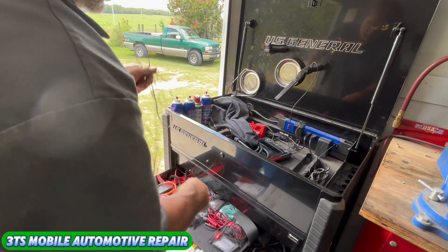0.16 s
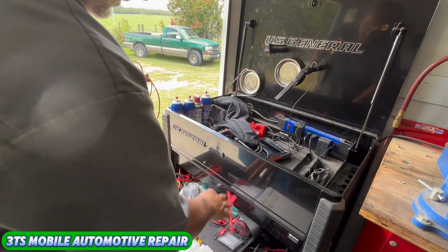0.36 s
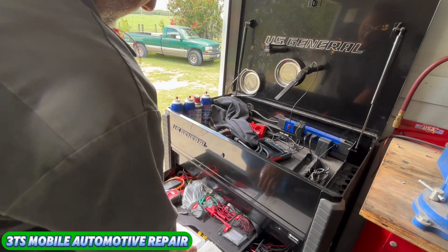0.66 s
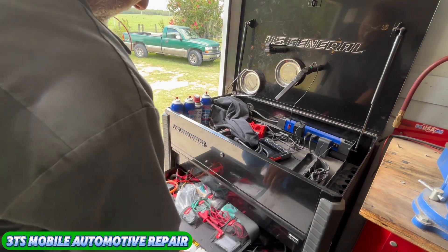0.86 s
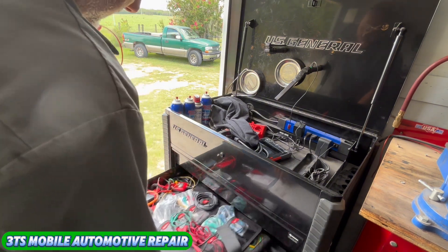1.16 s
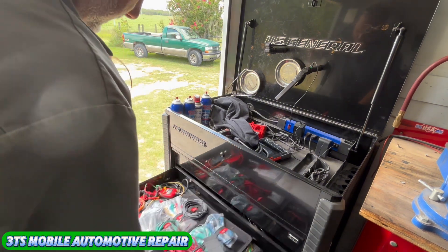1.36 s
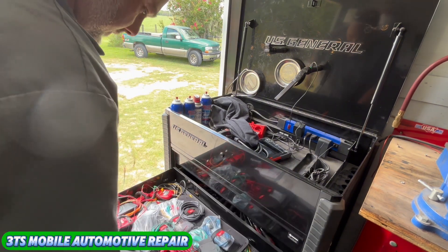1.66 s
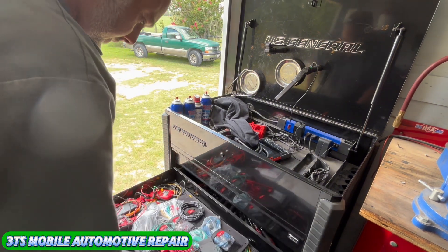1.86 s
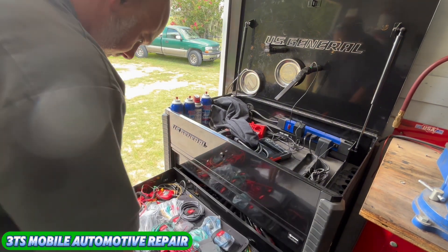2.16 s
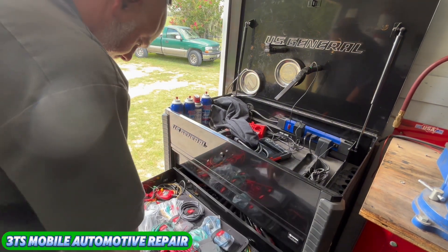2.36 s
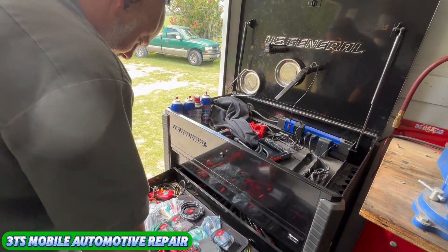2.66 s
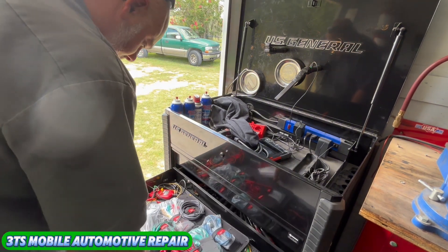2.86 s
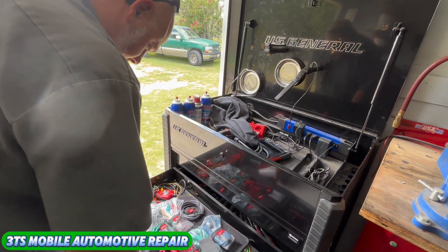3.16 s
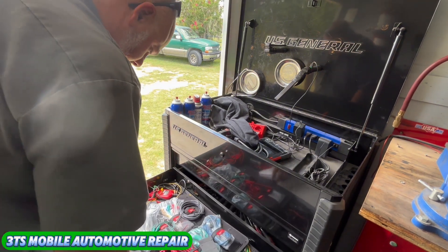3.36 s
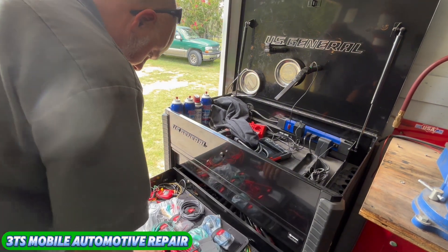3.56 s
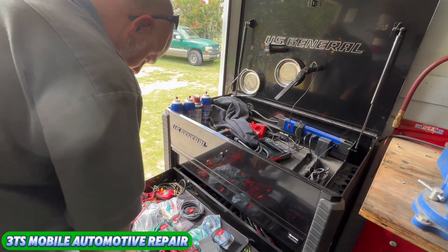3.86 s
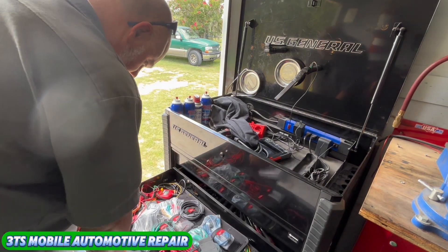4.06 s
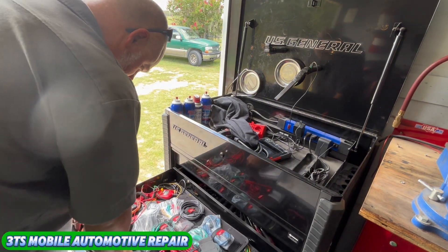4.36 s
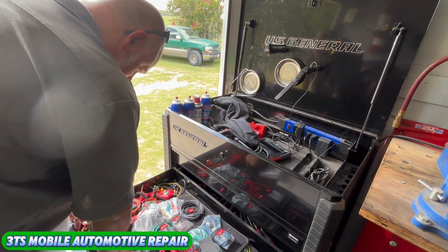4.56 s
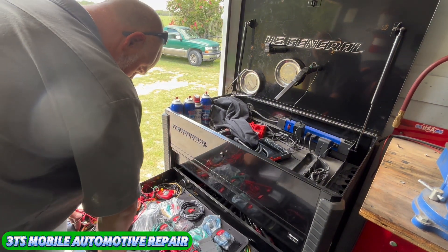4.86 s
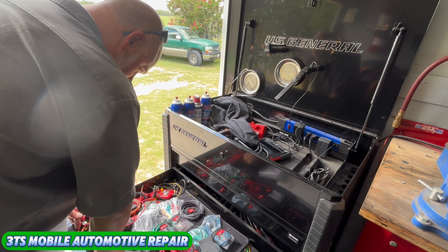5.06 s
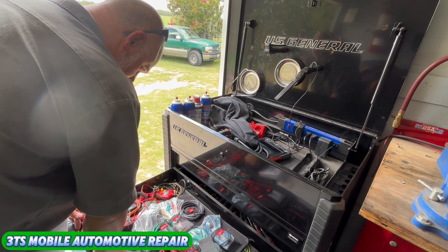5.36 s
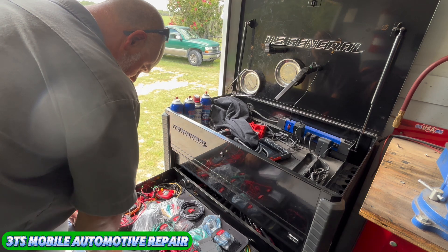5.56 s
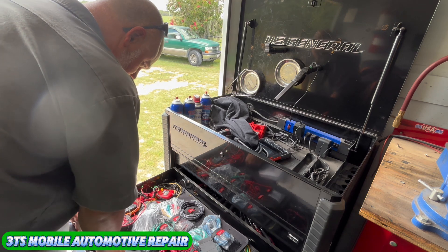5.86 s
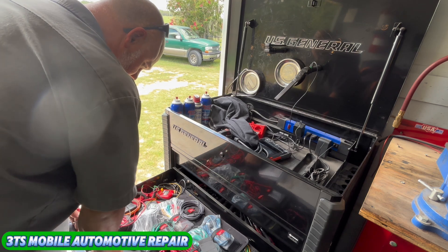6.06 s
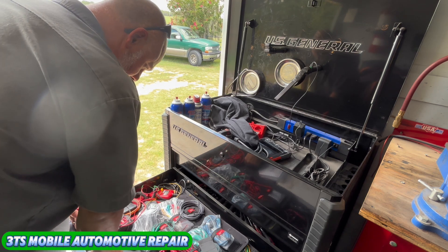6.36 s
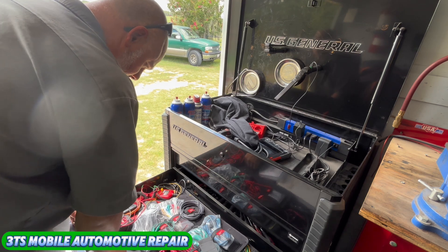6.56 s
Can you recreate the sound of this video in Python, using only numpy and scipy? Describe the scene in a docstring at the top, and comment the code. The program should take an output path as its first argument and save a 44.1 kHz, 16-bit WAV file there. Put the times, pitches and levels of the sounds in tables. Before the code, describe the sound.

One loud metallic clatter in a steel tool drawer, then lighter clinks and dull bumps of rummaging, with wind buffeting the microphone early on.

```python
"""Rummaging in a steel tool drawer

Someone digs through wires and small parts in a sheet-steel drawer, a metre from a phone by an open garage door.
Blows and clinks ring decaying steel modes and shaped noise; dragged wires catch and slip in bursts of it.
Gusts buffet the two microphone ports with low pulses and wavering noise bands, partly in opposition.
Filtered noise makes the low rumble, the distant swish and the outdoor hiss underneath."""
import sys
import numpy as np
from scipy import signal
from scipy.fft import rfft, irfft
from scipy.io import wavfile
from scipy.ndimage import uniform_filter1d

SR = 44100
rng = np.random.default_rng(int(sys.argv[2]) if len(sys.argv) > 2 else 0)


def voltage_ratio(level):
    """Linear amplitude factor for a level in decibels (scalar or array-like)."""
    return 10 ** (np.asarray(level, float) / 20)


def transcribe(u):
    """Save the signal u as a 16-bit wav file named by the first command-line argument.

    u: samples, shape (n,) or (channels, n), limited to [-1, 1]; the rate is SR.
    q: integer samples, one column per channel.
    """
    v = np.clip(np.atleast_2d(u).T, -1, 1)
    q = np.round(v * 32767).astype(np.int16)
    wavfile.write(sys.argv[1], SR, q)


N = 295911

# Ringing modes of the drawer pan and loose parts. Each row: frequency in Hz, level in dB,
# t60 in seconds for a blow whose own t60 is 0.17 s.
STEEL_MODES = [(194.6, 4.5, 0.3), (372.4, 9.5, 0.064), (442, 1.5, 0.13), (560, 3, 0.026),
               (673.6, -0.5, 0.11), (707, 6, 0.057), (870, 3, 0.023), (952, 14, 0.028), (1122, 9.5, 0.028),
               (1342, 4.5, 0.09), (1768, 8, 0.1), (2290, 1, 0.052), (3290, 0, 0.048), (3600, -20, 0.14),
               (4100, 2, 0.056), (4480, 3, 0.068)]
# Far-off sounds. Each row: time in seconds, low drone in dB, mid swish in dB, hiss in dB.
FAR_LEVELS = [(0, -68, -66, -52.5), (.7, -69, -64, -52), (1.0, -55, -47, -52.5), (1.35, -58, -49, -50.5),
              (1.8, -66, -64, -53), (2.6, -61, -68, -52.5), (4.0, -61, -74, -52.5), (5.2, -63, -62, -56.5),
              (5.6, -46.5, -63.5, -56), (6.2, -49, -71, -57), (6.71, -47, -69, -55)]
# Single eddies slapping the ports. Each row: start in seconds, slap level in dB, centre in Hz,
# level in dB of the buffeting that swells with it, time scale of that swell in seconds.
EDDIES = [(0.0, -44, 89, -34.5, 0.027), (0.17, -32, 190, -31, 0.26), (0.24, -20.5, 120, -21.5, 0.029),
          (0.277, -20, 300, -52, 0.081), (0.334, -35, 120, -26, 0.035), (0.673, -40, 144, -49, 0.044),
          (0.7, -33.5, 196, -59, 0.043), (0.822, -37.5, 222, -41, 0.022), (0.968, -30, 280, -28.5, 0.048),
          (1.171, -33, 280, -36.5, 0.012), (1.244, -35.5, 143, -38, 0.022), (1.342, -42, 90, -36.5, 0.14),
          (1.472, -54, 87, -28, 0.015), (1.555, -42, 110, -34.5, 0.028), (1.762, -22.5, 193, -27, 0.069),
          (1.799, -32, 122, -47, 0.047), (1.863, -24.5, 216, -32, 0.082), (1.913, -31.5, 152, -29.5, 0.036),
          (1.958, -31.5, 89.5, -47, .04), (2.044, -33, 190, -29, 0.035), (2.083, -27, 136, -35.5, 0.036),
          (2.208, -35.5, 169, -38.5, 0.039), (2.287, -33, 290, -60, 0.05), (2.414, -39.5, 353, -33, 0.013),
          (3.9, -38.5, 113, -40, 0.024), (4.61, -34.5, 150, -38.5, 0.036),
          (4.681, -39.5, 120, -40.5, 0.047), (5.929, -33.5, 217, -52, 0.051),
          (6.206, -53, 89, -44.5, 0.052)]
OPPOSED = np.array([[1], [-1]])  # left and right in opposite sign


def unit(x):
    """Scale to rms 1."""
    return x / np.sqrt(np.mean(x ** 2, axis=-1, keepdims=True) + 1e-30)


def curve(rows):
    """Columns of a time table, one value a sample."""
    s, *columns = np.transpose(rows)
    return [np.interp(np.arange(N) / SR, s, c) for c in columns]


def colour(x, points, lag_s=0.):
    """Filter through (Hz, dB) points, with a delay."""
    hz, db = np.transpose(points)
    f = np.arange(N // 2 + 1) * SR / N
    gain = voltage_ratio(np.interp(np.log(f + 1), np.log(hz), db))
    return irfft(rfft(x) * gain * np.exp(-2j * np.pi * f * lag_s), N)


def band(x, lo_hz, hi_hz, order=2):
    """Causal band-pass."""
    return signal.sosfilt(signal.butter(order, [lo_hz, hi_hz], "band", fs=SR, output="sos"), x)


def high_pass(x, hz, order):
    """Causal bass cut."""
    return signal.sosfilt(signal.butter(order, hz, "high", fs=SR, output="sos"), x)


def decay(t, t60):
    """Exponential fade that falls 60 dB in t60 seconds."""
    return np.exp(-np.log(1000) * t / t60)


def walk(rate):
    """Random levels held 1 / rate seconds and smoothed twice."""
    k = int(SR / rate)
    held = np.repeat(rng.standard_normal(N // k + 1), k)
    return 0.8 * uniform_filter1d(uniform_filter1d(held, k), k)[:N]


def steel_noise():
    """Dense ringing of sheet steel in three registers, one common and one private take for each port."""
    # Spectrum of the clatter. Each row: frequency in Hz, level in dB per Hz.
    clatter_spectrum = [(820, -45), (1400, 4), (2290, 12), (3010, 7.5), (3390, 7), (7070, -10), (9960, -13),
                        (11300, -29), (14200, -23.5), (15500, -54)]
    # Lift of the very top. Each row: frequency in Hz, gain in dB.
    top_lift = [(10800, 4), (11800, 9.5)]
    fizz_from_hz, pan_db = 6000, -8
    raw = rng.standard_normal((3, N))
    bright = colour(colour(raw, clatter_spectrum), top_lift)
    pan_hz = STEEL_MODES[0][0]
    pan = unit(band(raw, 0.956 * pan_hz, 1.076 * pan_hz))
    boom = unit(band(raw, 428, 740, order=1)) + voltage_ratio(pan_db) * pan
    clatter = band(bright, 550, fizz_from_hz)
    fizz = band(bright, fizz_from_hz, 13700, order=3)
    return [unit(p) for p in (boom, clatter, fizz)]


def blows(noise):
    """Each blow chatters briefly and rings the modes near where it lands, over a crack and a dying wash."""
    # Blows on the drawer. Each row: start in seconds, clatter level in dB, boom relative to the clatter in dB,
    # fizz relative to the clatter in dB (both before fixed trims), t60 of the wash in seconds.
    blow_rows = [(0.343, -30, -12.5, -31, 0.13), (0.4042, -5, -10.5, -15, 0.18),
                 (0.435, -21, -20, -6.5, 0.079), (0.4983, -24, -22, -14.5, 0.029),
                 (0.536, -39.5, 18.5, -2, 0.075), (0.545, -41, 18.5, -17, 0.12),
                 (0.5645, -44.5, 13, 3, 0.31), (1.4264, -24.5, -2, -1, 0.15),
                 (1.4444, -30.5, 4, -5.5, 0.39), (1.5189, -39, -6, -5, 0.07), (1.604, -18, -2, -5, 0.15),
                 (1.681, -57.5, 8, 3.5, 1), (1.8886, -44, -8, -1.5, 0.13), (2.529, -40.5, 1.5, -8, 0.18),
                 (2.7702, -44.5, 6, -7, 0.13), (2.8096, -47.5, -8, -6, 1), (2.9626, -44, 10, -3.5, 0.19),
                 (3.3049, -32, 3.5, -9.5, 0.13), (3.3997, -59, 11.5, 6.5, 0.61), (3.5014, -48, 6, 0, 0.47),
                 (3.5322, -29, 13, -1, 0.057), (3.538, -27, -4, -9, 0.066), (3.55, -35, -6, -6.5, 0.4),
                 (3.6092, -37, 8.5, -6, 0.12), (3.6316, -44.5, 13, 3, 0.26), (3.6866, -33, 9, -7, 0.12),
                 (3.7, -41, 10.5, 1, 0.18), (3.7389, -45.5, 9.5, -1, 0.13),
                 (3.7884, -48.5, 16.5, -14, 0.16), (4.0731, -22.5, 3, -35, 0.19),
                 (4.196, -37, -34, -11, 0.11), (4.2762, -43.5, -20, -9.5, 0.27),
                 (4.4427, -48, 15, -23, 0.29), (4.4868, -50, 23.5, -28, 0.047),
                 (4.8214, -38, -8, -14, 0.091), (4.8365, -38.5, 12, -26, 0.086),
                 (4.854, -50, 27, -20, 0.05), (4.8635, -41, -8, 1, 0.086), (4.872, -50.5, 30, -10, 0.033),
                 (4.8882, -47.5, -12, 5.5, 0.23), (4.9213, -41.5, 12.5, -18, 0.077),
                 (5.0399, -26.5, -24.5, -10.5, 0.15), (5.1694, -58.5, 14, -21, 0.12),
                 (5.4055, -33, -14, -16, 0.16), (5.5494, -62, 16, -21, 0.19),
                 (5.6241, -45.5, -14, -8.5, 0.14), (5.8694, -63.5, 17, -26, 0.3),
                 (5.9369, -36, -2.5, -10, 0.12), (6.0852, -32.5, -6, -16, 0.15),
                 (6.1409, -43.5, 1.5, -33, 0.24), (6.4717, -43, 7.5, -20, 0.16),
                 (6.6627, -40.5, -14, -12.5, 0.28)]
    # Where the blows land. Each row: time in seconds, centre of the boom in Hz before a random stray.
    landing_rows = [(0.4, 670), (1.44, 473), (1.6, 550), (2.77, 920), (2.96, 560), (3.3, 415), (3.5, 890),
                    (3.53, 890), (3.66, 394), (3.79, 690), (4.07, 463), (4.46, 434), (4.84, 560),
                    (4.875, 332), (4.92, 560), (5.94, 408), (6.14, 630), (6.48, 402)]
    stray_oct, boom_width_oct, boom_top_hz = 0.041, 0.93, 1500
    ring_db, pan_db, bright_db, spread_db = -17, -9, -8, 3.0
    wash_db, crack_db, crack_s = -10, -10, 0.00052
    rattle_db, rattle_s, first_contact = 3.0, 0.01, 10.2
    boom_rise_s, contact_s, softest_s = 0.0017, 0.00038, 0.0017
    tick_db, tick_s = 2.0, 0.0035

    out = np.zeros((3, N + SR))
    t = np.arange(SR // 4) / SR
    count = len(blow_rows)
    hz, mode_db, mode_t60 = np.transpose(STEEL_MODES)
    tick = unit(band(rng.standard_normal(N), 11600, 14000))  # thin top edge of a contact
    rattle = voltage_ratio(rattle_db * walk(130))  # loose parts hop about, so the wash is uneven
    swell = 1 - np.exp(-t * hz[:, None] / (boom_rise_s * hz[0]))  # low panels take longer to get going
    chance = rng.standard_normal((count, 2, len(hz)))
    chatter = rng.standard_normal((count, 3, SR // 20)) * np.exp(-t[:SR // 20] / rattle_s)
    chatter[:, :, 0] += first_contact  # the first contact is the firmest
    chatter /= np.sqrt(np.sum(chatter ** 2, axis=2, keepdims=True))
    landing = np.interp(np.transpose(blow_rows)[0], *np.transpose(landing_rows))
    landing = landing * 2 ** (stray_oct * rng.uniform(-1.5, 1, count))

    for row, boom_hz, (size, tune), push in zip(blow_rows, landing, chance, chatter):
        s, db, boom_db, fizz_db, t60 = row
        i = int(s * SR)
        n = min(len(t), N - i)
        near_db = -6 * (np.log2(hz / boom_hz) / boom_width_oct) ** 2
        near_db[0] = pan_db  # the whole pan flexes wherever it is struck
        share_db = np.where(hz < boom_top_hz, boom_db + near_db + 8.0, bright_db)
        gain = voltage_ratio(ring_db + mode_db + share_db + spread_db * size)
        # a long clatter keeps the modes going longer
        fade = decay(t, mode_t60[:, None] * t60 / 0.17)
        tuned_hz = hz * (1 + 0.0063 * tune)
        ring = gain @ (fade * swell * np.sin(2 * np.pi * tuned_hz[:, None] * t))
        # dull blows come from soft things that push longer
        soft = 1 - np.exp(-t / min(contact_s * voltage_ratio(boom_db), softest_s))
        out[:, i:i + len(t)] += voltage_ratio(db) * soft * signal.fftconvolve(ring[None], push, axes=1)[:, :len(t)]

        tail = voltage_ratio(wash_db) * decay(t, t60) * soft
        crack = voltage_ratio(crack_db) * np.exp(-t / crack_s) * np.sqrt(soft)
        boom, clatter, fizz = (p[:, i:i + n] for p in noise)
        # the wash is strongest near the struck panel's pitch and builds up slowly
        near_boom = voltage_ratio(-6.5) * band(boom, boom_hz / 1.8, boom_hz * 1.08)
        near_clatter = voltage_ratio(-6.0) * band(clatter, boom_hz, boom_hz * 2.45)
        boom = (boom + near_boom + near_clatter) * (1 - np.exp(-t[:n] / 0.0035))
        wash = voltage_ratio(boom_db + 3.5) * boom * tail[:n]
        wash = wash + (clatter + voltage_ratio(fizz_db + 7.0) * fizz) * (tail + crack)[:n]
        out[:, i:i + n] += voltage_ratio(db) * wash * rattle[i:i + n]
        # the tick joins the common take only, so it is alike at both ports
        out[0, i:i + n] += voltage_ratio(db + fizz_db + tick_db) * np.exp(-t[:n] / tick_s) * tick[i:i + n]
    return out[:, :N]


def clinks():
    """A shaken part or panel rings on one unsteady, broken tone; high and quickly damped ones are broad."""
    # Parts whose ring stands out. Each row: start in seconds, frequency in Hz, level in dB,
    # rise in seconds, t60 in seconds.
    clink_rows = [(0.405, 1200, -24, 0.0053, 0.14), (0.407, 1328, -26.5, 0.0055, 0.13),
                  (3.306, 1370, -30, 0.0016, 0.04), (4.074, 1450, -34, 0.003, 0.2),
                  (5.94, 436, -40, 0.005, 0.11), (0.404, 369, -18, 0.02, 0.068),
                  (0.406, 694, -23.5, 0.017, 0.16), (0.405, 952, -19.5, 0.0096, 0.11),
                  (0.404, 1593, -15, 0.006, 0.068), (0.405, 2300, -22.5, 0.005, 0.12),
                  (0.405, 3480, -15, 0.0042, 0.079), (0.498, 2200, -39, 0.003, 0.051),
                  (1.605, 890, -26, 0.0029, 0.081), (1.605, 2440, -29.5, 0.003, 0.1),
                  (1.604, 3420, -25.5, 0.0027, 0.1), (1.604, 4960, -27.5, 0.00089, 0.029),
                  (3.537, 2430, -30, 0.0015, 0.042), (3.538, 3100, -35, 0.002, 0.06),
                  (4.076, 448, -28, 0.0065, 0.14), (4.077, 1036, -30.5, 0.0031, 0.15),
                  (4.904, 6540, -43, 0.001, 0.058), (0.579, 2860, -38.5, 0.017, 0.22),
                  (0.581, 4100, -39.5, 0.017, 0.23), (1.68, 4120, -35, 0.00073, 0.035),
                  (4.084, 4100, -41, 0.017, 0.13), (4.194, 2770, -47, 0.0016, 0.12),
                  (4.195, 4900, -44, 0.0013, 0.022), (4.866, 3320, -41, .001, 0.071),
                  (4.887, 6700, -37.5, .001, 0.06), (5.039, 2064, -36, 0.0029, 0.084),
                  (5.405, 4000, -44.5, 0.001, 0.07), (5.625, 2880, -51, 0.002, 0.05),
                  (5.039, 3860, -28.5, 0.00076, 0.054), (5.04, 8400, -38, 0.0012, 0.13),
                  (5.407, 3460, -43.5, 0.00078, 0.07), (6.085, 3750, -38.5, 0.0029, 0.14),
                  (1.889, 3750, -44, .001, 0.055), (5.94, 2430, -43, 0.0017, 0.056)]
    width, blur, rough_hz = 0.02, 0.31, 2000
    waver, broken_db_per_khz = 0.0044, 0.57
    out = np.zeros((3, N + SR))
    t = np.arange(SR // 3) / SR
    turns = rng.uniform(0, 2 * np.pi, (len(clink_rows), 3, 1))
    noises = rng.standard_normal((len(clink_rows), 3, len(t)))
    jolts = np.pad(broken_db_per_khz * walk(90), (0, SR))
    for (s, hz, db, rise_s, t60), raw, turn in zip(clink_rows, noises, turns):
        i = int(s * SR)
        shape = np.sqrt(np.minimum(t / rise_s, 1)) * decay(np.maximum(t - rise_s, 0), t60)
        drift = np.cumsum(1 + waver * unit(uniform_filter1d(raw, size=400)), axis=1) / SR
        width_hz = width * hz + blur * np.sqrt(hz) / t60 / 10
        tone = np.sqrt(2) * np.sin(2 * np.pi * hz * drift + turn)
        tone = tone + hz / rough_hz * unit(band(raw, hz - width_hz, hz + width_hz, order=1))
        level = voltage_ratio(db + hz / 1000 * jolts[i:i + len(t)])
        out[:, i:i + len(t)] += level * shape * unit(tone)
    return out[:, :N]


def drags(noise):
    """Strands catch and slip unevenly; every slip is a short burst of the steel's noise."""
    # Wire dragging over the steel. Each row: start in seconds, length in seconds, rasp level in dB,
    # boom relative to the rasp in dB, share of the length spent swelling (0-1).
    drag_rows = [(0.55, 0.18, -41, -20, 0.4), (1.418, 0.18, -31.5, 5, 0.09), (1.947, 0.095, -52, -12, 0.76),
                 (2.767, 0.077, -50, 7, 0.5), (2.936, 0.1, -51.5, -1, 0.18), (3.297, 0.64, -56, 8, 0.01),
                 (3.591, 0.19, -46.5, 6.5, 0.41), (4.804, 0.18, -53, 12.5, 0.64)]
    slips_per_s, slip_db, slip_s, fizz_db = 380, 5, 0.0074, -8
    start_db, end_db = -27, -34  # relative to the height of the drag
    slip_sizes = voltage_ratio(slip_db * np.minimum(rng.exponential(size=N), 3))
    hits = (rng.random(N) < slips_per_s / SR) * slip_sizes
    grain = unit(signal.lfilter([1], [1, -np.exp(-1 / (slip_s * SR))], hits))
    rasp, boom = np.zeros(N), np.zeros(N)
    for s, length_s, db, boom_db, swell in drag_rows:
        a, n = int(s * SR), int(length_s * SR)
        shape_db = np.interp(np.arange(n) / n, [0, swell, 1], [start_db, 0, end_db])
        pull = signal.windows.tukey(n, .15) * voltage_ratio(db + shape_db)
        rasp[a:a + n] += pull
        boom[a:a + n] += pull * voltage_ratio(boom_db)
    return grain * (boom * noise[0] + rasp * (noise[1] + voltage_ratio(fizz_db) * noise[2]))


def stirring(noise):
    """The hand keeps stirring the heap: parts nudge the pan in faint bumps at random times."""
    from_s, bumps_per_s, bump_db, spread_db = 3.3, 19, -62, 3
    t60, clatter_db = 0.14, -8
    hits = (rng.random(N) < bumps_per_s / SR) * voltage_ratio(bump_db + spread_db * rng.standard_normal(N))
    hits = hits * (np.arange(N) > from_s * SR)
    bump = signal.lfilter([1], [1, -decay(1 / SR, t60)], hits)
    return uniform_filter1d(bump, size=300) * (noise[0] + voltage_ratio(clatter_db) * noise[1])


def garage(x):
    """A short dull tail from the chest lid and the walls, different at each port."""
    t60, wet_db, first_echo_s = 0.21, -16, .004
    t = np.arange(int(SR * .4)) / SR
    tail = band(rng.standard_normal((2, len(t))), 190, 7500, order=1) * decay(t, t60) * (t > first_echo_s)
    tail /= np.sqrt(np.sum(tail ** 2, axis=1, keepdims=True))
    return voltage_ratio(wet_db) * signal.fftconvolve(x[None], tail, axes=1)[:, :N]


def puffs():
    """Each eddy slaps the ports with a few rough low cycles that swell and die."""
    cycles, side_db, rough = 1.23, 3, 0.19  # the slap peaks after this many cycles
    out = np.zeros((2, N + SR))
    t = np.arange(SR // 8) / SR
    turns = rng.uniform(0, 2 * np.pi, (len(EDDIES), 2, 1))
    noises = rng.standard_normal((len(EDDIES), 2, len(t)))
    for (s, db, hz, *_), raw, turn in zip(EDDIES, noises, turns):
        i = int(s * SR)
        u = t * hz / cycles
        slap = np.sin(2 * np.pi * hz * t + turn) + rough * unit(band(raw, hz / 2, hz * 2))
        mid, side = u * np.exp(1 - u) * slap
        out[:, i:i + len(t)] += voltage_ratio(db) * (mid + voltage_ratio(side_db) * side * OPPOSED)
    return out[:, :N]


def knocks():
    """A push of air between two pulls, a few milliseconds long and a little ragged."""
    # Sharp low knocks at the ports. Each row: time of the middle in seconds, level in dB, centre in Hz.
    knock_rows = [(0.243, -29, 454), (0.283, -20, 590), (1.868, -26, 420), (1.918, -35, 377),
                  (2.293, -29.5, 443), (2.422, -31.5, 407)]
    side_db, rough = -3, 0.13
    out = np.zeros((2, N))
    t = np.arange(-400, 400) / SR
    for s, db, hz in knock_rows:
        u = np.pi * hz * t
        bell = np.exp(-u ** 2 / 2)
        ragged = unit(band(rng.standard_normal((2, len(t))), hz / 2, hz * 2, order=4))
        mid = bell * ((1 - 2 * u ** 2) * bell + rough * ragged[0])
        side = bell * ragged[1]
        i = int(s * SR) - len(t) // 2
        out[:, i:i + len(t)] += voltage_ratio(db) * (mid + voltage_ratio(side_db) * side * OPPOSED)
    return out


def buffeting():
    """Breeze plus a swell for each eddy; the crackle follows the pitch of the eddy that rules."""
    # Steady breeze between the eddies. Each row: time in seconds, buffet level in dB.
    breeze = [(0, -50), (.12, -47.5), (.6, -47), (1.09, -48.5), (1.4, -44), (1.7, -34), (1.95, -44),
              (2.01, -41), (2.17, -46.5), (2.25, -36), (2.34, -42), (2.5, -43.5), (2.65, -63), (3.2, -50.5),
              (4.2, -53), (5.0, -54), (6.71, -53.5)]
    # tighter eddies flap higher
    calm_db, db_per_oct, crackle_hz, rise = -5.5, 6.5, 280, 0.33
    t = np.arange(N) / SR
    power = voltage_ratio(curve(breeze)[0]) ** 2
    crackle = power * calm_db
    for s, _, hz, swell_db, length_s in EDDIES:
        u = np.maximum(t - s, 0) / (rise * length_s)
        swell = (voltage_ratio(swell_db) * u * np.exp(1 - u)) ** 2
        power = power + swell
        crackle = crackle + swell * db_per_oct * np.log2(hz / crackle_hz)
    return 10 * np.log10(power), crackle / power


def wind():
    """Fluttering noise bands press the ports together and in opposition; tighter eddies lift the high bands."""
    side_db, flutter_db, left_db = 5, 4.0, 1.5
    buffet_db, crackle_db = buffeting()
    crackle_db = np.minimum(crackle_db, 6)
    # Each row: low edge in Hz, high edge in Hz, level in dB, flutter steps a second, opposed part in dB.
    layers = [(38.2, 73.0, buffet_db - 4.5, 8.8, side_db),
              (65.4, 123.0, buffet_db - 4.0, 11, side_db),
              (162.0, 333, buffet_db + crackle_db, 27, side_db - 5.5),
              (300, 460, buffet_db + 2.5 * crackle_db - 30.0, 36, side_db + 16.5)]
    out = puffs() + knocks()
    # a calm spell leaves less opposition between the ports
    calm_db = np.clip(1.4 * (buffet_db + 45.5), -8, 0)
    for lo_hz, hi_hz, db, rate, opposed_db in layers:
        flutter = voltage_ratio(flutter_db * walk(rate))
        mid, side = unit(band(rng.standard_normal((2, N)), lo_hz, hi_hz) * flutter)
        out = out + voltage_ratio(db) * (mid + voltage_ratio(opposed_db + calm_db) * side * OPPOSED)
    return out * voltage_ratio(left_db * OPPOSED)


def wind_guard(x, gusts):
    """While the ports are buffeted the phone raises its bass cut on the drawer's sound."""
    knee_db, hold_s, windy_hz, calm_hz = -42, 0.74, 330, 165
    power = uniform_filter1d(np.mean(gusts ** 2, axis=0), int(hold_s * SR))
    buffet_db = 10 * np.log10(power + 1e-12)
    windy = np.clip((buffet_db - knee_db) / 4, 0, 1)
    return windy * high_pass(x, windy_hz, 4) + (1 - windy) * high_pass(x, calm_hz, 4)


def outdoors():
    """Smooth far-off hiss, partly alike at both ports, that wavers a little."""
    # Spectrum of the outdoors. Each row: frequency in Hz, level in dB per Hz.
    far_spectrum = [(24, -13), (40, 9), (75, 34), (146, -39), (192, -30), (377, -7), (509, -13),
                    (926, -12.5), (1600, -16.5), (9650, -27.5), (11200, -32), (13300, -30.5), (15500, -56)]
    alike, waver_db = 0.27, 0.32
    raw = rng.standard_normal((3, N))
    hiss = unit(band(colour(alike * raw[0] + raw[1:], far_spectrum), 179, 14800, order=4))
    return voltage_ratio(curve(FAR_LEVELS)[2] + waver_db * walk(2.03)) * hiss


def rumble():
    """A wavering low drone, alike at both ports, and a soft mid swish that swells once."""
    drone_db, swish_db, _ = curve(FAR_LEVELS)
    drone = voltage_ratio(drone_db) * unit(band(rng.standard_normal(N), 50.6, 65.0))
    swish = voltage_ratio(swish_db) * unit(band(rng.standard_normal((2, N)), 430, 840))
    return drone + swish


def scene():
    """The drawer is nearer the left port: earlier there, and louder over most of the range."""
    # Difference between the ports. Each row: frequency in Hz, left minus right in dB.
    port_balance = [(60, 10), (110, 6), (200, 1), (380, 0.5), (700, 3.5), (1290, 5.5), (2380, 3), (4400, 6),
                    (8120, -2), (15000, -2.5)]
    # Share of the drawer's sound that both ports have in common. Each row: frequency in Hz, level in dB.
    alike_share = [(400, -0.5), (900, -3), (9000, -13), (12000, -8)]
    left_lead_s = 0.0001895
    noise = steel_noise()
    common, *private = blows(noise) + drags(noise) + stirring(noise) + clinks()
    # the private share fills up the power that the common share leaves
    private_share = [(hz, 10 * np.log10(1 - voltage_ratio(min(db, -.2)) ** 2)) for hz, db in alike_share]
    drawer = colour(common, alike_share) + colour(np.array(private), private_share) + garage(common)
    gusts = wind()
    near = wind_guard(drawer, gusts) + outdoors()
    half = np.array(port_balance) * [1, .5]
    left = colour(near[0], half)
    right = colour(near[1], half * [1, -1], left_lead_s)
    return np.array([left, right]) + gusts + rumble()


def low_pass(x):
    """Removes everything above the highest recorded frequency."""
    return signal.sosfilt(signal.butter(12, 16050, fs=SR, output="sos"), x)


def record(dry):
    """The phone cuts the deepest bass and the top and rounds the loudest peak."""
    rounded = np.tanh(high_pass(dry, 42, 2))
    top_cut = signal.ellip(8, .5, 35, 14900, fs=SR, output="sos")
    return low_pass(signal.sosfilt(top_cut, rounded))


dry = scene()
out = record(dry)
transcribe(out)
```